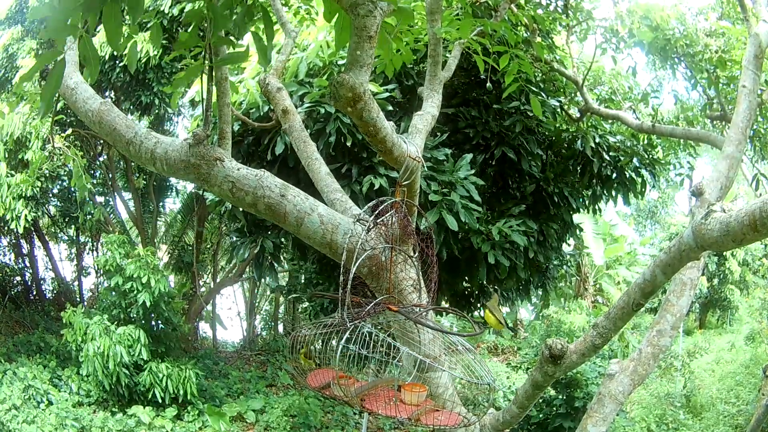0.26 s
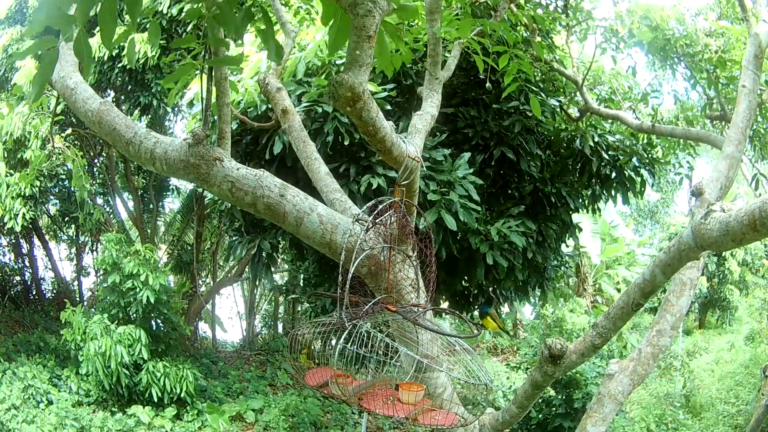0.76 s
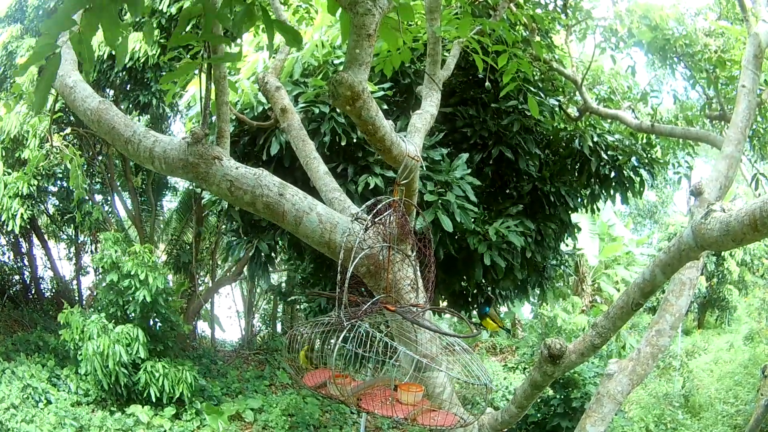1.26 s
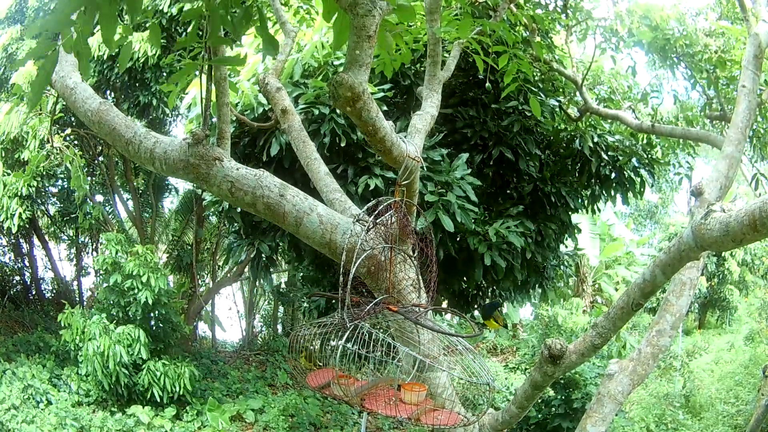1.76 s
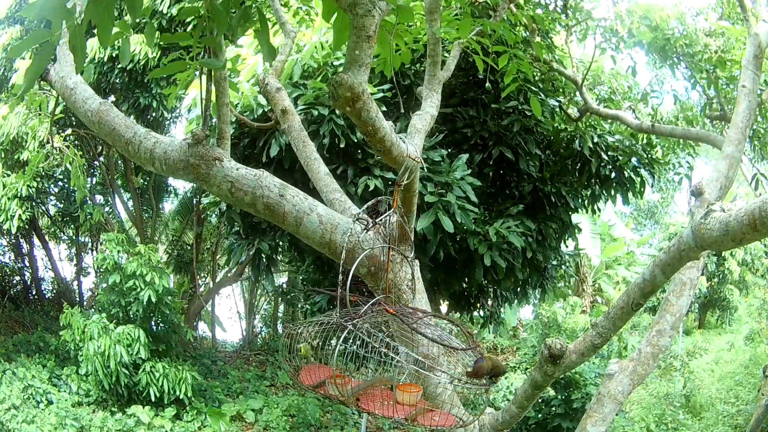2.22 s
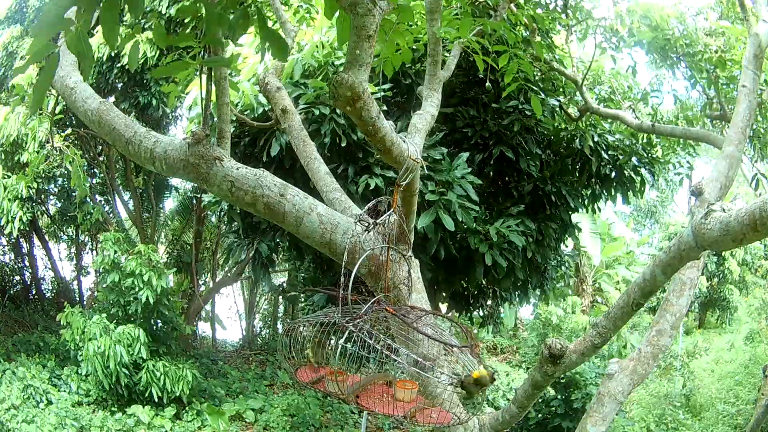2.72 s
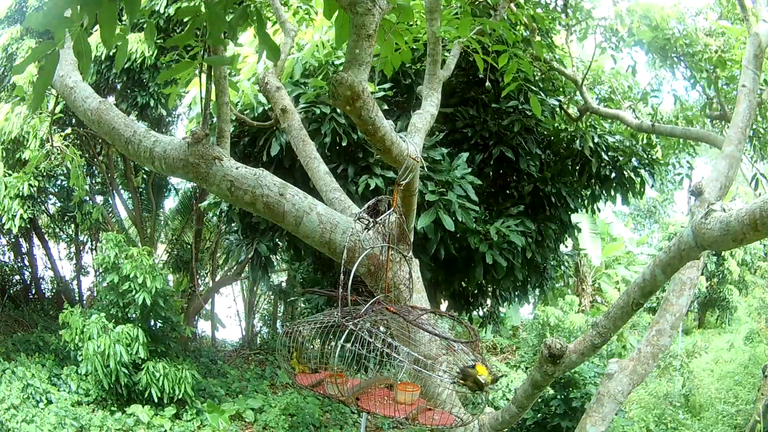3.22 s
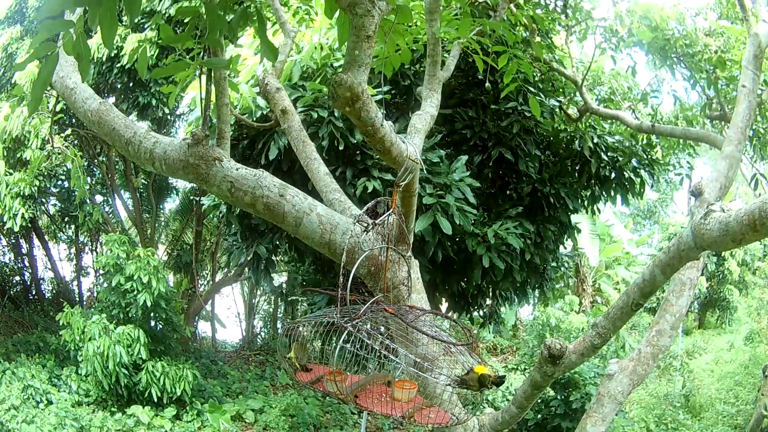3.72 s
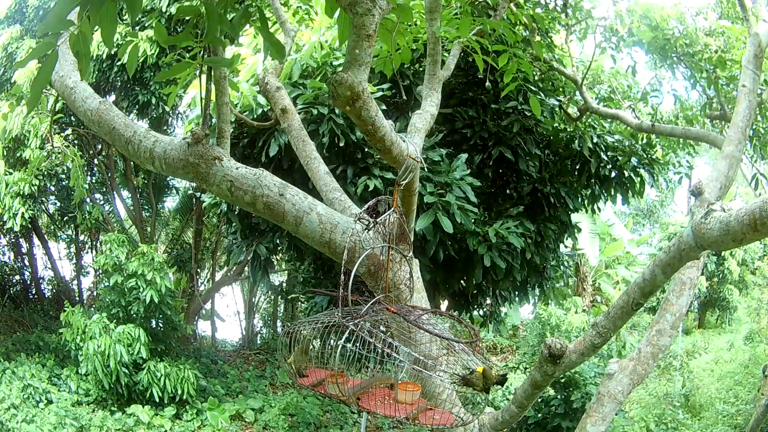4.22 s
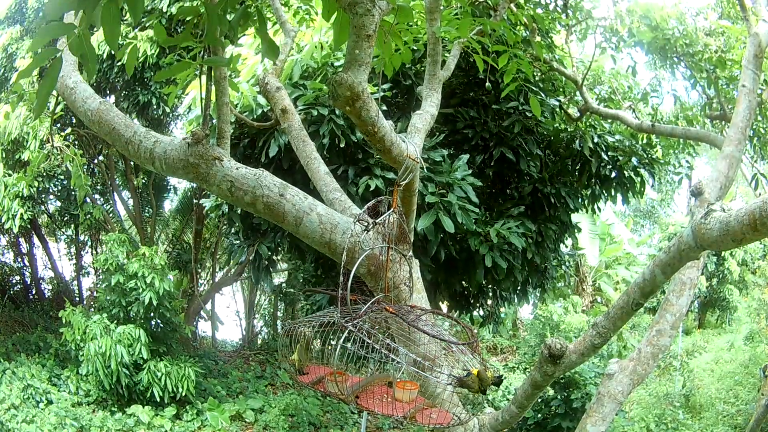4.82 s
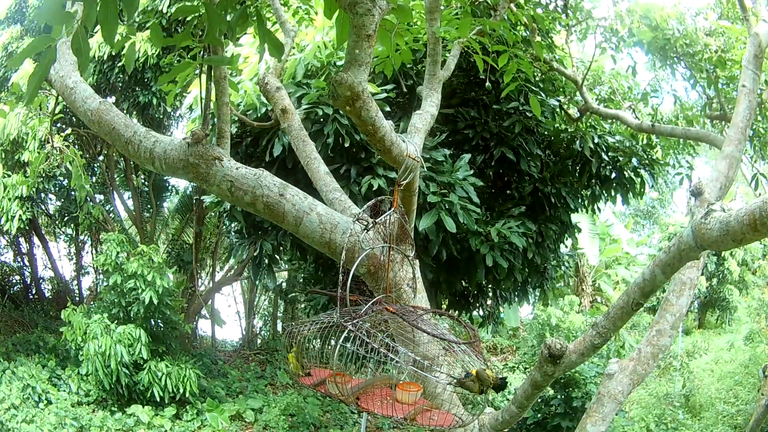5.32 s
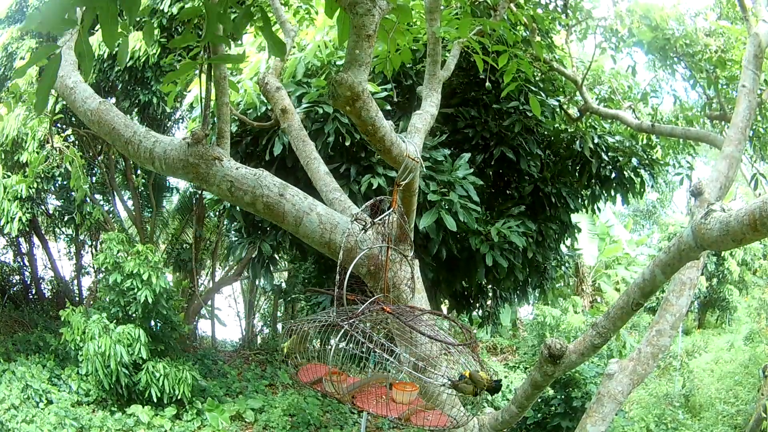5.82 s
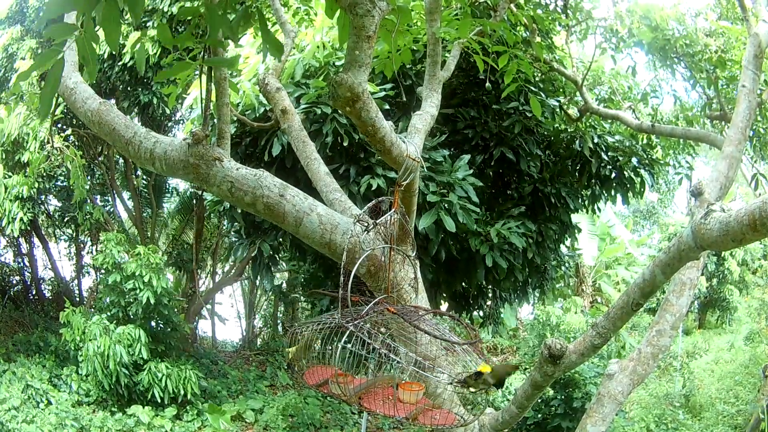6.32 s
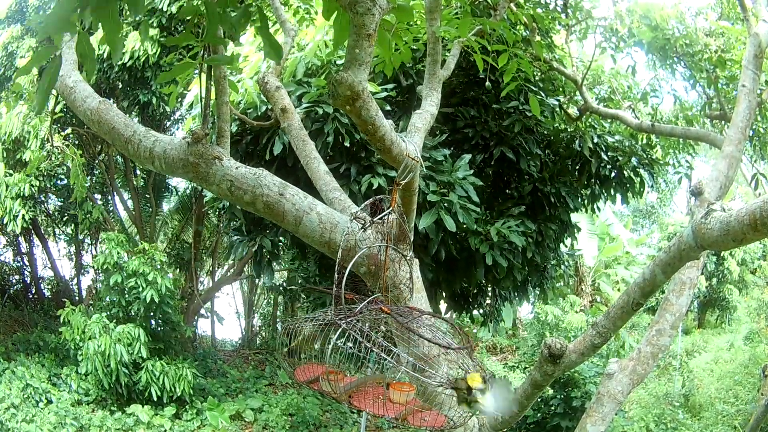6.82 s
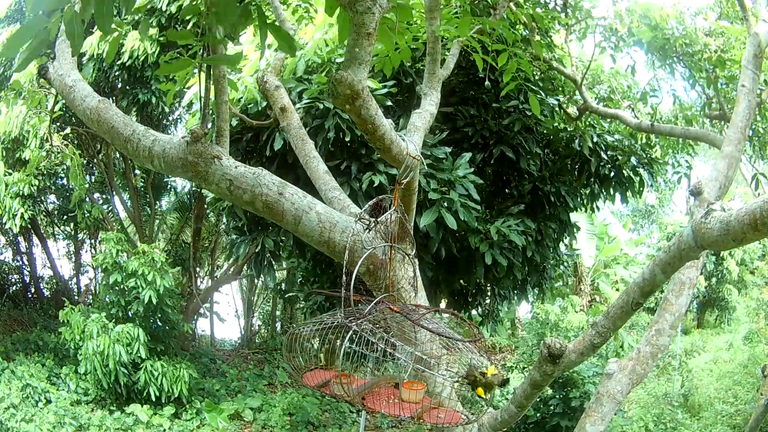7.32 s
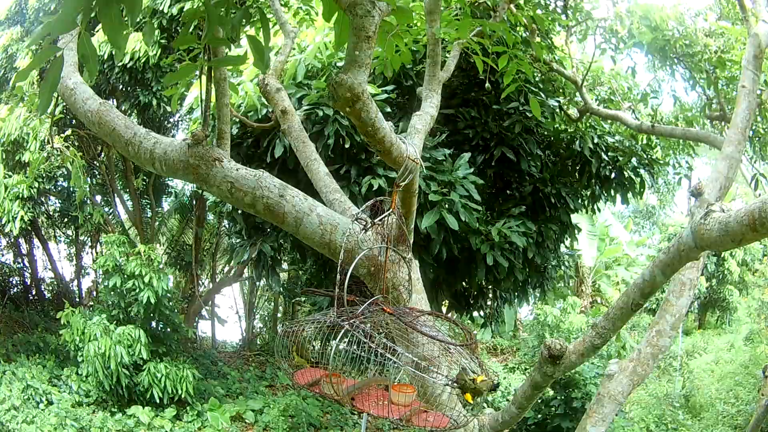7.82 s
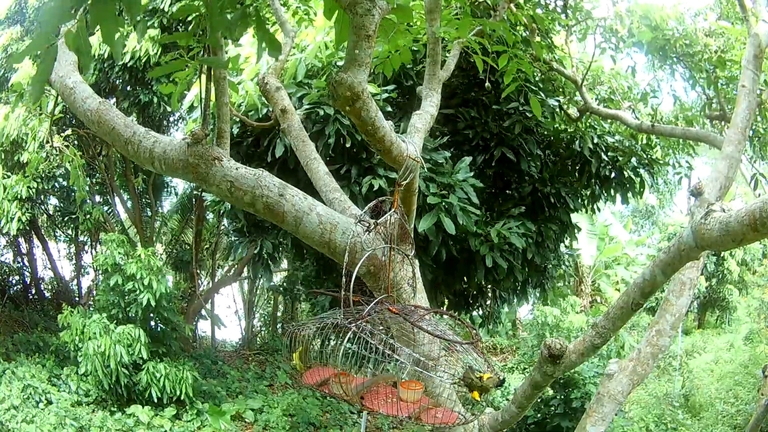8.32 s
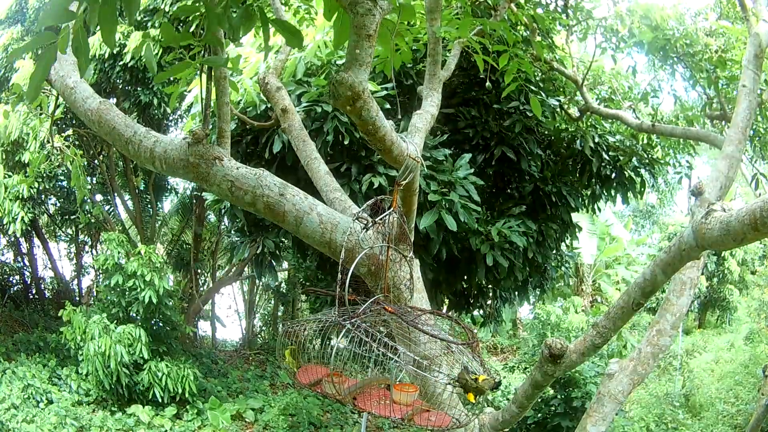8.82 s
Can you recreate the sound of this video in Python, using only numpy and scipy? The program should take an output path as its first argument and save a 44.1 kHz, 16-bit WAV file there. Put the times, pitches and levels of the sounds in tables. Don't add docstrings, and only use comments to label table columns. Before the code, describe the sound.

A windy garden with trees, about nine seconds. Low, uneven wind rumble and soft thumps on the microphone run throughout over faint hiss and a distant twittering flock. From 0 to 1.6 s faint, high whistles come from farther trees, with one buzzy note at 0.7. From 1.7 to 3.1 s a small bird chatters in rapid, rasping, climbing notes, about ten a second; faint twig ticks at 2.1. A short nasal squeak pops up close at 2.9. Sharp rising whistles, each after two tiny chips, come at 3.6, 4.2 and 5.0. A trembling arched whistle answers at 5.3, then chatter resumes 5.5 to 6.7, strengthening after 6.1. A tiny thin high call at 7.05 precedes whistles at 7.2, 7.9 and 8.6, with another warbled arch at 7.6. Wind blows hit hardest from 7.5 on, notably 7.7 and 8.9. Calls have a short, leafy, scattered tail.

```python
import sys
import numpy as np
from scipy import signal
from scipy.fft import rfft, irfft, next_fast_len
from scipy.io import wavfile
from scipy.ndimage import uniform_filter1d

SR = 44100
rng = np.random.default_rng(int(sys.argv[2]) if len(sys.argv) > 2 else 0)


def convert_level_to_amplitude(level_db):
    exponent = np.asarray(level_db, float) / 20
    return 10 ** exponent


def file_out(sig):
    cols = np.atleast_2d(sig).T
    lim = np.clip(cols, -1, 1)
    pcm = np.round(lim * 32767).astype(np.int16)
    wavfile.write(sys.argv[1], SR, pcm)


N = 399546

WHISTLES = [
    (3.601, -35, 0.143, 0.217, 6550),
    (4.213, -36.5, 0.167, 0.235, 6500),
    (4.968, -36.5, 0.152, 0.236, 6250),
    (7.227, -34, 0.143, 0.212, 6500),
    (7.946, -35, 0.153, 0.237, 6600),
    (8.624, -33, 0.138, 0.221, 6450),
]
# [time_s, pitch_hz, level_db]
WHISTLE_SHAPE = [(.04, 3035, -24), (0.055, 3540, -20), (0.067, 3870, -6), (.095, 4271, 0.3),
                 (.143, 4705, -3), (0.175, 5450, -1), (.198, 6000, -8), (0.213, 6450, -11),
                 (.218, 6550, -24)]
# end of fast onset, knee, end [time_s]
WHISTLE_JOINTS = (.07, .143, .215)
# [multiple, level_db]
WHISTLE_OVERTONES = [(2, -22), (3, -18.5)]
# [time_s, pitch_hz, level_db]
CHIPS = [
    [(-.003, 3980, -30.5), (0, 4190, -18.5), (.008, 5230, -12.5), (.014, 5370, -14), (.022, 5540, -17),
     (.027, 5650, -37.5)],
    [(.008, 3650, -20.5), (.013, 3630, -21.5), (.021, 3700, -21), (.024, 4290, -9), (.028, 4085, -6),
     (.033, 4380, -45)],
]
# [freq_hz, level_db]
NEAR_SCATTER = [(3000, 4.5), (3900, -1), (4350, -0.5), (4800, -0.5), (5500, 2.5), (6500, -1.5)]

# [start_s, level_db, from_hz, top_hz, climb_time_constant_s]
ARCHES = [
    (5.303, -37.5, 3700, 5170, 0.024),
    (7.592, -36.5, 4120, 5535, .08),
]
# [share_of_length, sag_hz, level_db, warble_swing_hz]
ARCH_SHAPE = [(0, 1.5, -19, 60), (.05, 4, -6, 60), (.15, -0.5, 2.5, 60), (.3, 7, -0.5, 89.6),
              (.45, -3, 0, 190), (.8, 29, -3, 210), (.92, 196, -11, 220), (1, 450, -22, 200)]
# [start_s, length_s, level_db, from_hz, to_hz]
SOFT_WHISTLES = [
    (0.858, .11, -49, 4260, 4650),
    (0.86, .09, -57, 4250, 4280),
    (.97, .13, -63, 4490, 4630),
    (1.463, 0.19, -53, 4270, 4970),
]
WARBLE_HZ, ARCH_S, SOFT_EDGE_S = 106.1, 0.23, 0.006

# [start_s, level_db, length_s, from_hz, closing_pip_hz]
CHATTER = [(0.738, -41.5, 0.041, 4870, 6350), (1.677, -42, 0.047, 4800, 6060),
           (1.887, -43.5, 0.056, 4740, 6040), (1.979, -42.5, 0.05, 4600, 6000),
           (2.079, -43.5, 0.07, 4770, 6250), (2.18, -45, 0.052, 4555, 6400),
           (2.294, -47.5, 0.047, 4920, 6300), (2.393, -48, 0.062, 4890, 6070),
           (2.493, -45, 0.053, 4680, 6400), (2.608, -47.5, 0.065, 4970, 6400),
           (2.757, -48, 0.085, 4720, 6200), (2.892, -42.5, 0.046, 4640, 6040),
           (3.069, -43.5, .065, 4667, 5840), (3.379, -59, 0.061, 4700, 6100),
           (4.872, -57, 0.041, 4800, 6100), (5.497, -50.5, 0.084, 4830, 6300),
           (5.651, -49, 0.051, 4820, 6450), (5.784, -50, 0.061, 5280, 6400),
           (5.902, -48.5, 0.047, 5020, 6500), (5.998, -49, 0.068, 4950, 6530),
           (6.107, -43, 0.057, 4634, 6200), (6.215, -44, 0.058, 4590, 6400),
           (6.321, -44, 0.056, 4630, 6200), (6.431, -42.5, 0.064, 4620, 6440),
           (6.544, -42, 0.054, 4604, 6430), (6.663, -43, 0.071, 4615, 6570)]
# [freq_hz, level_db]
RASP_COLOUR = [(2700, -29.5), (3100, -11), (3500, -18), (3750, -4.5), (4400, 4), (5300, -6.5), (6100, -4.5),
               (6600, -18), (7500, -42)]
CHATTER_CLIMB_HZ, BUZZ_HZ, BUZZ_SWING_HZ = 750, 139.8, 680
CHATTER_FLOOR_HZ = 3550
PIP_DB, RASP_DB = -7, -14

# [time_s, pitch_hz, level_db]
SQUEAK = [
    (2.894, 2100, -6),
    (2.911, 2340, 0),
    (2.93, 2140, -5),
    (2.951, 2385, -3),
    (3.028, 2530, -3),
    (3.055, 2385, 2),
    (3.084, 2130, -6),
    (3.103, 2390, -2),
    (3.111, 2130, -7),
]
# [multiple, level_db]
SQUEAK_PARTIALS = [(1, -36.5), (2, -51.5), (3, -39.5), (4, -48)]
# [multiple, level_db]
SQUEAK_HALVES = [(1.5, -66), (2.5, -56), (3.5, -50)]
# [time_s, pitch_hz, level_db]
SEEP = [
    (7.045, 5500, -58),
    (7.05, 6900, -44),
    (7.055, 7750, -43),
    (7.06, 6650, -36),
    (7.07, 6450, -35),
    (7.079, 6650, -41),
    (7.085, 7550, -43),
    (7.091, 7550, -45),
    (7.097, 6900, -62),
]
SQUEAK_EDGE_S, SQUEAK_EDGE_DB = .005, -8
HALVES_FROM_S, HALVES_TO_S = 2.995, 3.028

# [start_s, level_db, length_s, from_hz, to_hz]
FAR_NOTES = [(0, -72, 0.072, 4280, 4470), (0.2, -58, 0.066, 4890, 5000), (0.01, -55.5, 0.072, 5270, 6000),
             (0.174, -55.5, 0.092, 4280, 4550), (0.35, -58.5, 0.061, 4400, 4570),
             (0.565, -51.5, 0.049, 4350, 4870), (0.648, -60, 0.064, 4350, 4600),
             (1.119, -62, 0.089, 4480, 4200), (1.223, -65, 0.11, 4250, 4540), (.93, -61, 0.064, 5100, 5400),
             (1.359, -68, 0.035, 3770, 3800), (1.4, -60, 0.075, 5320, 5450), (1.136, -61, 0.24, 5220, 5290),
             (1.548, -46, 0.044, 5040, 5770), (0.335, -58, 0.042, 5050, 5650),
             (3.42, -62, 0.05, 4280, 4420), (3.51, -52, 0.024, 5100, 5470), (4.1, -58, 0.02, 4400, 4400),
             (4.702, -55.5, 0.057, 5240, 5760), (5.276, -65, 0.051, 4140, 4050),
             (5.497, -46.5, 0.019, 3880, 4350), (6.882, -58, 0.14, 4500, 4850),
             (7.097, -60.5, 0.02, 4360, 4290), (7.57, -46, 0.02, 4390, 4600), (8.4, -60, 0.028, 5120, 5070),
             (4.043, -75, 0.044, 4470, 4500), (6.954, -65, 0.036, 4950, 5050),
             (8.53, -69, 0.01, 4580, 4560), (8.9, -52, 0.05, 4750, 4840)]
# [start_s, level_db, length_s, pitch_hz]
PIPING = [(0.838, -72, 0.14, 3180), (1.41, -71, 0.08, 3230), (2.612, -65, 0.012, 3000),
          (7.32, -70, .04, 3000), (7.42, -71, .03, 3060), (7.46, -72, .04, 3000), (7.555, -73, .05, 3040),
          (2.14, -60, .03, 2200), (5.29, -72, .08, 3100), (8.47, -69, 0.037, 3320), (8.96, -70, 0.05, 3010),
          (2.55, -52, .04, 4200), (5.712, -58, .07, 3900), (7.482, -58, .057, 3970),
          (7.728, -49, .042, 4200), (7.785, -50, .014, 4200), (7.81, -50, .02, 4200)]

BRANCH_T60_S, ECHO_T60_S = 0.09, 0.37
NEAR_BRANCH_DB, NEAR_ECHO_DB = -11, -6.5
WARBLER_BRANCH_DB, WARBLER_ECHO_DB = -9, -9
FAR_BRANCH_DB, FAR_ECHO_DB = -4, -5
VISITOR_ECHO_DB = -14.5
DISTANT_BRANCH_DB, DISTANT_ECHO_DB = -4.5, -3.5
NEAR_BOUNCE_S, NEAR_BOUNCE_DB = .00205, -10
FAR_BOUNCE_S, FAR_BOUNCE_DB = .00094, -7
SECOND_CHATTERER_S, SECOND_BOUNCE_S, SECOND_BOUNCE_DB = 5.3, .00164, -11
# [freq_hz, level_db]
HOUSING = [(2500, -27), (3100, -4), (3640, -6.5), (3830, -3), (4350, -0.5), (4700, -6.5), (5000, -7),
           (5250, -10.5), (5450, -12), (6150, -12.5), (6450, -19.5), (7700, -24), (8100, -31), (15000, -37)]

# [start_s, level_db, t60_s]
TICKS = [
    (2.139, -56, 0.02),
    (2.147, -57, 0.05),
    (2.156, -55, 0.04),
    (2.185, -58, .015),
    (4.942, -62, .01),
    (2.232, -59, .015),
    (6.065, -63, 0.03),
]
# [freq_hz, level_db]
TWIG_COLOUR = [(600, 4), (1300, 17.5), (2150, 12.5), (2700, 9.5), (7000, -10), (9000, -9), (16000, -30)]
# [time_s, level_db]
CHORUS = [(0.0, -83), (0.25, -62.5), (0.4, -61), (0.8, -60.5), (1.0, -67), (1.54, -61), (1.9, -71),
          (2.2, -61), (3.1, -68.5), (4.36, -63.5), (4.72, -74), (5.45, -62), (6.0, -65.5), (6.31, -68),
          (6.6, -66), (7.4, -67), (7.74, -65.5), (9.06, -69)]

# [time_s, thump_db]
WIND = [(0.0, -52), (0.48, -48.5), (1.21, -35.5), (1.59, -45.5), (2.37, -39), (2.5, -69), (2.75, -49.5),
        (3.23, -41.5), (4.39, -51.5), (4.59, -70), (4.69, -41), (5.53, -43), (5.75, -40), (6.84, -41),
        (7.04, -36), (8.33, -41.5), (8.5, -48), (9.06, -33)]
# [time_s, thump_db, width_s, # brightness_db]
BUFFETS = [(0.698, -29.5, 0.022, -14.5), (1.26, -27.5, 0.05, -9), (1.379, -28, 0.064, -10),
           (2.15, -30, 0.044, -11), (2.37, -33, 0.27, -13), (3.15, -35.5, 0.19, -15),
           (3.28, -32.5, 0.024, -7), (3.45, -31, 0.062, -12), (3.59, -28.5, 0.038, -12),
           (4.691, -29, 0.11, -12.5), (5.08, -32, 0.027, -16), (5.31, -30.5, 0.025, -9.5),
           (5.452, -30.5, 0.051, -12), (5.9, -31, 0.058, -13), (6.12, -32, 0.02, -18),
           (6.23, -28, 0.054, -16), (6.45, -28, 0.048, -13), (6.58, -24, 0.027, -12.5),
           (7.13, -29, 0.094, -26), (7.309, -34, 0.076, -13), (7.41, -48, 0.176, -26),
           (7.502, -26.5, 0.095, -13.5), (7.71, -20.5, 0.044, -9.5), (7.831, -24.5, 0.047, -10.5),
           (7.98, -27, 0.037, -16), (8.1, -30.5, 0.11, -12.5), (8.261, -24, 0.051, -12),
           (8.43, -29.5, 0.098, -14.5), (8.689, -29, 0.057, -10.5), (8.93, -22, 0.04, -10.5),
           (0.018, -36.5, 0.058, -12), (.175, -34.5, 0.018, -17), (0.284, -30.5, 0.011, -14.5),
            (.34, -40, 0.069, -14), (.385, -42.5, 0.018, -15), (.51, -36.5, 0.011, -16),
            (.615, -32.5, 0.049, -13), (.79, -53, 0.027, -17), (.98, -30.5, 0.024, -10),
            (1.051, -31, 0.012, -7.5), (1.69, -34.5, 0.035, -9.5), (1.77, -32, 0.017, -9),
            (1.82, -31.5, 0.013, -13.5), (1.9, -34.5, 0.044, -9.5), (2.0, -35, 0.01, -10),
            (2.653, -36, 0.034, -12), (2.78, -33.5, 0.028, -17), (3.05, -34.5, 0.071, -12.5),
            (3.72, -37.5, 0.11, -10), (4.216, -37, 0.029, -14), (4.38, -36, 0.025, -13),
            (4.615, -42, 0.027, -21), (4.871, -30, 0.021, -11.5), (5.175, -35, 0.019, -27),
            (5.645, -45, 0.027, -22), (5.962, -34.5, 0.022, -6.5), (6.83, -33, 0.056, -12.5),
            (6.949, -37, 0.21, -12), (7.1, -29.5, 0.043, -7.5), (7.625, -28, 0.042, -12),
            (8.18, -29, 0.015, -17), (8.596, -26.5, 0.022, -11.5), (9.031, -29, 0.069, -10)]
# [time_s, depth_db]
LULLS = [(0.57, -10), (1.58, -7), (2.73, 3), (3.55, -25), (4.16, -8), (4.32, -19), (4.44, -9), (4.91, -15),
         (6.08, -2.5), (6.33, -5.5), (6.76, -45), (7.229, -8), (7.93, -7), (8.56, -0.5)]
# [freq_hz, level_db_per_hz]
GUST = [(20, -10), (45, 0.5), (100, -3.5), (180, -9), (280, -6), (400, -21.5), (550, -29.5), (1100, -48.5),
        (5000, -110)]
LULL_S, PUSH_DB, PUSH_BRIGHT_DB, BUFFET_BRIGHT_DB = 0.043, 3.5, -5.5, 6.5
SUB_DB, SUB_FOLLOWS, MEAN_THUMP_DB = -46.5, 0.81, -32.5
PORT_LIMIT = .16
# [freq_hz, level_db_per_hz]
AIR = [(50, -66), (110, -72), (200, -87.5), (400, -88.5), (1050, -91.5), (1500, -99), (1900, -107),
       (2800, -112), (5000, -115), (7500, -118), (8000, -122), (11500, -122.5), (13500, -120.5),
       (16000, -120)]


def at_hz(points, hz):
    points_hz, points_db = np.transpose(points)
    return np.interp(np.log(hz + 1), np.log(points_hz), points_db)


def colour(x, points):
    size = next_fast_len(N + 4096)
    hz = np.arange(size // 2 + 1) * SR / size
    return irfft(rfft(x, size) * convert_level_to_amplitude(at_hz(points, hz)), size)[:N]


def rms_one(x):
    return x / np.sqrt(np.mean(x ** 2))


def drift(rate_hz, size=N):
    r = np.exp(-2 * np.pi * rate_hz / SR)
    noise = rng.standard_normal(size + 2500)
    return rms_one(signal.lfilter([1], [1, -2 * r, r * r], noise)[2500:])


def sing(out, rows, partials=((1, 0),), warble_hz=0, throb=0., wobble=0.0014):
    rows = np.array(rows, float)
    at = np.arange(int(rows[0, 0] * SR), min(N, int(rows[-1, 0] * SR)))
    hz, db, *swing = [np.interp(at / SR, rows[:, 0], column) for column in rows.T[1:]]
    swing_hz = swing[0] if swing else 0
    unsteady = drift(247, size=len(at))
    rate_hz = warble_hz * (1 + 0.062 * drift(40, size=len(at)))
    beat = 2 * np.pi * (np.cumsum(rate_hz) / SR + rng.random())
    hz = hz * (1 + wobble * unsteady) + swing_hz * np.sin(beat)
    phase = 2 * np.pi * np.cumsum(hz) / SR
    level = convert_level_to_amplitude(db) * np.sqrt(2) * (1 + throb * np.cos(beat))
    out[at] += level * sum(convert_level_to_amplitude(k_db) * np.sin(k * phase) for k, k_db in partials)


def whistler():
    out, shape = np.zeros(N), np.array(WHISTLE_SHAPE)
    fast, knee, end = WHISTLE_JOINTS
    bend_hz, last_hz = shape[4, 1], shape[-1, 1]
    for s, db, knee_s, end_s, top_hz in WHISTLES:
        times = np.interp(shape[:, 0], [0, fast, knee, end, end + 1], [0, fast, knee_s, end_s, end_s + 1])
        hz = np.interp(shape[:, 1], [0, bend_hz, last_hz], [0, bend_hz, top_hz])
        rows = np.c_[s + times, hz, db + shape[:, 2]]
        sing(out, rows, warble_hz=WARBLE_HZ, throb=0.1, wobble=0.006)
        sing(out, rows[2:5], WHISTLE_OVERTONES, wobble=.008)
        for chip in CHIPS:
            sing(out, np.array(chip) + [s, 0, db], wobble=.026)
    return out


def warblers():
    out, age = np.zeros(N), np.linspace(0, ARCH_S, num=60)
    share, *shape = np.transpose(ARCH_SHAPE)
    sag_hz, shape_db, swing_hz = [np.interp(age / ARCH_S, share, column) for column in shape]
    for s, db, from_hz, top_hz, climb_s in ARCHES:
        hz = top_hz - (top_hz - from_hz) * np.exp(-age / climb_s) - sag_hz
        rows = np.c_[s + age, hz, db + shape_db, swing_hz]
        sing(out, rows, warble_hz=WARBLE_HZ, throb=.22, wobble=.012)
    for s, length, db, from_hz, to_hz in SOFT_WHISTLES:
        rows = [(s - SOFT_EDGE_S, from_hz, db - 22),
                (s, from_hz, db - 0.8),
                (s + 0.37 * length, from_hz + 0.72 * (to_hz - from_hz), db),
                (s + length, to_hz, db - 2),
                (s + length + SOFT_EDGE_S, to_hz, db - 24)]
        sing(out, rows, warble_hz=WARBLE_HZ, throb=.3, wobble=.008)
    return out


def buzz(out, s, db, length, from_hz, to_hz, swing_hz, wobble, throb=.28):
    share = np.array([0, .08, .5, .9, 1])
    hz = from_hz + (to_hz - from_hz) * share ** 1.755
    level_db = db + np.array([-18, -7, 0.8, -2.5, -20])
    rows = np.c_[s + share * length, hz, level_db, swing_hz * (1 - .45 * share)]
    sing(out, rows, warble_hz=BUZZ_HZ, throb=throb, wobble=wobble)


def chatterer():
    out = np.zeros(N)
    for s, db, length, from_hz, pip_hz in CHATTER:
        to_hz = from_hz + CHATTER_CLIMB_HZ
        buzz(out, s, db, length, from_hz, to_hz, BUZZ_SWING_HZ, wobble=.015, throb=.85)
        buzz(out, s + length, db + PIP_DB, 0.01, pip_hz - 60, pip_hz + 40, swing_hz=60, wobble=0.017)
    return out


def rasp():
    level, t = np.zeros(N), np.arange(N) / SR
    for s, db, length, *_ in CHATTER:
        at = slice(int(s * SR), int((s + length) * SR))
        swell_db = np.interp((t[at] - s) / length, [0, .04, .4, .85, 1], [-24, 4, 12.5, -1.5, -20])
        level[at] = convert_level_to_amplitude(db + RASP_DB + swell_db)
    puffs = (1 + np.sin(2 * np.pi * BUZZ_HZ * t + 4.2 * drift(13.0))) ** 2
    breath = rms_one(colour(rng.standard_normal(N), RASP_COLOUR))
    return level * breath * rms_one(puffs)


def visitor():
    out = np.zeros(N)
    first, last = np.array(SQUEAK)[[0, -1]]
    fade_in = first + [-SQUEAK_EDGE_S, 0, SQUEAK_EDGE_DB]
    fade_out = last + [SQUEAK_EDGE_S, 0, SQUEAK_EDGE_DB]
    rows = np.vstack([fade_in, SQUEAK, fade_out])
    sing(out, rows, SQUEAK_PARTIALS, warble_hz=55.0, throb=0.2, wobble=0.008)
    halves = [(s, np.interp(s, *rows.T[:2]), 0) for s in (HALVES_FROM_S, HALVES_TO_S)]
    sing(out, halves, SQUEAK_HALVES, warble_hz=60.0, throb=.5, wobble=.006)
    sing(out, SEEP)
    return out


def singers():
    out = np.zeros(N)
    for s, db, length, from_hz, to_hz in FAR_NOTES:
        buzz(out, s, db - 0.5, length, from_hz, to_hz, swing_hz=120, wobble=.012)
    for s, db, length, hz in PIPING:
        buzz(out, s, db, length, hz, hz, swing_hz=40, wobble=0.019)
    return out


def orchard(x, branch_db, echo_db):
    age, response = np.arange(SR // 2) / SR, 0
    for db, t60, density in ((branch_db, BRANCH_T60_S, .15), (echo_db, ECHO_T60_S, 1)):
        taps = rng.standard_normal(len(age)) * (rng.random(len(age)) < density)
        taps = taps * convert_level_to_amplitude(-60 * age / t60) * np.minimum(age / 0.0065, 1)
        response = response + taps * convert_level_to_amplitude(db) / np.sqrt(np.sum(taps ** 2))
    response[0] = 1
    return signal.fftconvolve(x, response)[:N]


def ground(x, lag_s, db):
    lag = int(lag_s * SR)
    bounce = np.r_[np.zeros(lag), x[:-lag]]
    return (x + convert_level_to_amplitude(db) * bounce) / np.sqrt(1 + convert_level_to_amplitude(db) ** 2)


def twig():
    out, age = np.zeros(N), np.arange(SR // 20) / SR
    for s, db, t60 in TICKS:
        at = int(s * SR)
        out[at:at + len(age)] += convert_level_to_amplitude(db - 60 * age / t60) * rng.standard_normal(len(age))
    return colour(out, TWIG_COLOUR)


def flock():
    out, count = np.zeros(N), 360
    for k, (late, pitch, loud) in enumerate(rng.random((count, 3))):
        s = (k + late) * (N / SR - .1) / count
        height = pitch ** 1.6
        buzz(out, s, 4 * loud, 0.09, 4100 + 1550 * height, 4300 + 1600 * height, swing_hz=510, wobble=.03)
    out = rms_one(colour(orchard(out, 13, 12.0), HOUSING))
    out = rms_one(out / (uniform_filter1d(out ** 2, size=6000) + .02) ** 0.58)
    s, db = np.transpose(CHORUS)
    return out * convert_level_to_amplitude(np.interp(np.arange(N) / SR, s, db))


def bell(t, s, width):
    return .5 ** ((2 * (t - s) / width) ** 2)


def gusts():
    t = np.arange(0, N / SR, .001)
    s, db = np.transpose(WIND)
    thump = convert_level_to_amplitude(np.interp(t, s, db) + PUSH_DB) ** 2
    bright = thump * convert_level_to_amplitude(PUSH_BRIGHT_DB) ** 2
    for s, db, width, bright_db in BUFFETS:
        hump = convert_level_to_amplitude(db) ** 2 * bell(t, s, width)
        thump = thump + hump
        bright = bright + hump * convert_level_to_amplitude(bright_db + BUFFET_BRIGHT_DB) ** 2
    lull_db = sum(db * bell(t, s, LULL_S) for s, db in LULLS)
    return [np.interp(np.arange(N) / SR, t, 10 * np.log10(power) + lull_db) for power in (thump, bright)]


def wind():
    thump_db, bright_db = gusts()
    sub_db = SUB_DB + SUB_FOLLOWS * (thump_db - MEAN_THUMP_DB) + 7.0 * drift(4.4)
    eddies = colour(rng.standard_normal(N), GUST)
    lumps = 1.73 * np.tanh(drift(24.2) / 1.17)
    bands = ((55, "low", sub_db + 0.9, 1.2),
             ((60, 240), "band", thump_db, 3.2),
             (180, "high", bright_db - 0.5, 3.8))
    out = 0
    for edges_hz, kind, db, lump_db in bands:
        band = rms_one(signal.sosfilt(signal.butter(2, edges_hz, kind, fs=SR, output="sos"), eddies))
        band = rms_one(band / (uniform_filter1d(band ** 2, size=1800) + 0.028) ** 0.54)
        out = out + band * convert_level_to_amplitude(db + lump_db * lumps)
    return PORT_LIMIT * np.tanh(out / PORT_LIMIT)


def background_air():
    return np.sqrt(SR / 2) * colour(rng.standard_normal(N), AIR)


def scene():
    direct = whistler()
    scattered = orchard(direct, NEAR_BRANCH_DB, NEAR_ECHO_DB) - direct
    near = direct + colour(scattered, NEAR_SCATTER)
    near += orchard(warblers(), WARBLER_BRANCH_DB, WARBLER_ECHO_DB)
    near = ground(near, NEAR_BOUNCE_S, NEAR_BOUNCE_DB)

    throat = signal.butter(4, CHATTER_FLOOR_HZ, "high", fs=SR, output="sos")
    far = orchard(signal.sosfilt(throat, chatterer() + rasp()), FAR_BRANCH_DB, FAR_ECHO_DB)
    first_chatterer = ground(far, FAR_BOUNCE_S, FAR_BOUNCE_DB)
    second_chatterer = ground(far, SECOND_BOUNCE_S, SECOND_BOUNCE_DB)
    far = np.where(np.arange(N) < SECOND_CHATTERER_S * SR, first_chatterer, second_chatterer)

    close = orchard(visitor(), VISITOR_ECHO_DB, VISITOR_ECHO_DB)
    distant = orchard(singers(), DISTANT_BRANCH_DB, DISTANT_ECHO_DB)
    birds = colour(near + close + far + distant, HOUSING)
    return (birds + twig() + flock() + wind() + background_air())[None]


def band_limit(x):
    return signal.sosfilt(signal.butter(12, 15730, fs=SR, output="sos"), x)


def record(dry):
    return band_limit(dry)


dry = scene()
out = record(dry)
file_out(out)
```